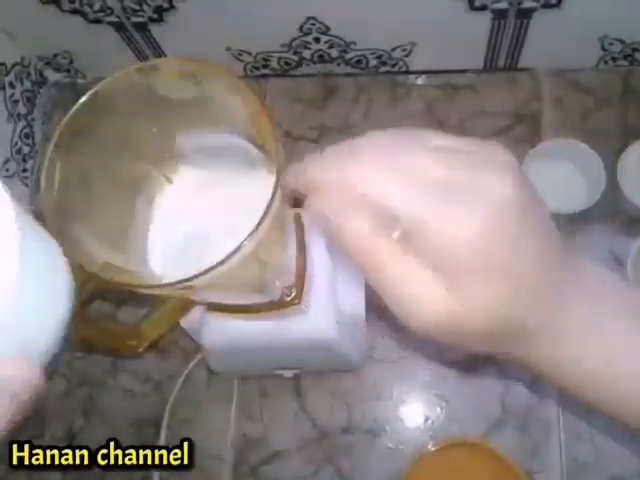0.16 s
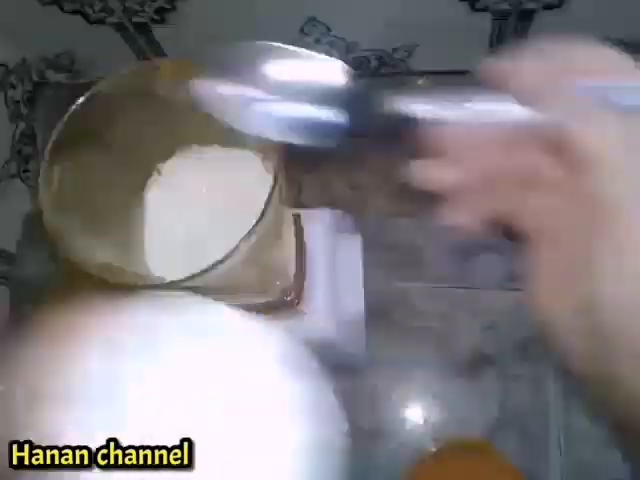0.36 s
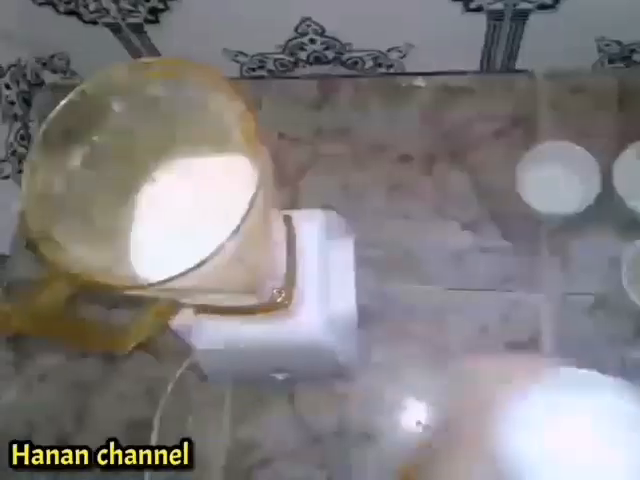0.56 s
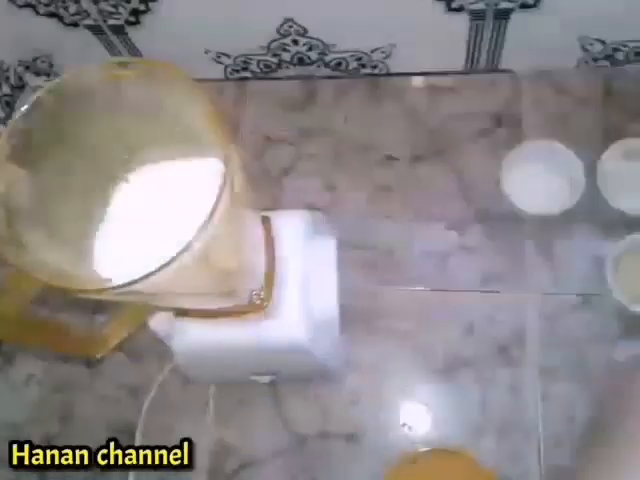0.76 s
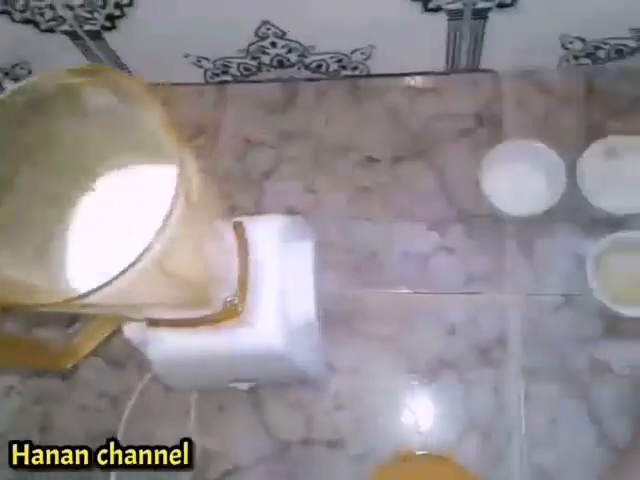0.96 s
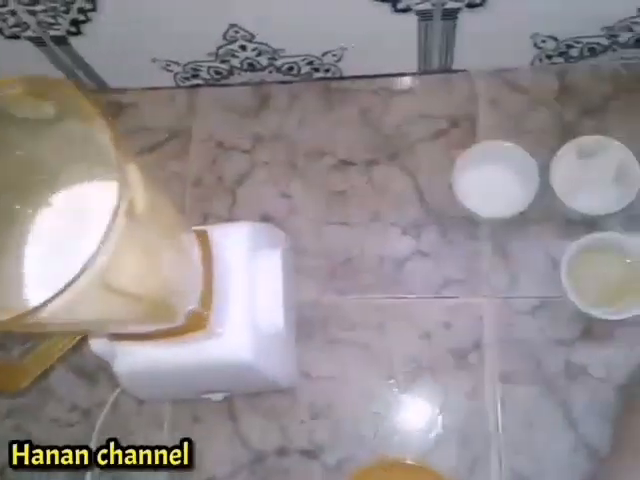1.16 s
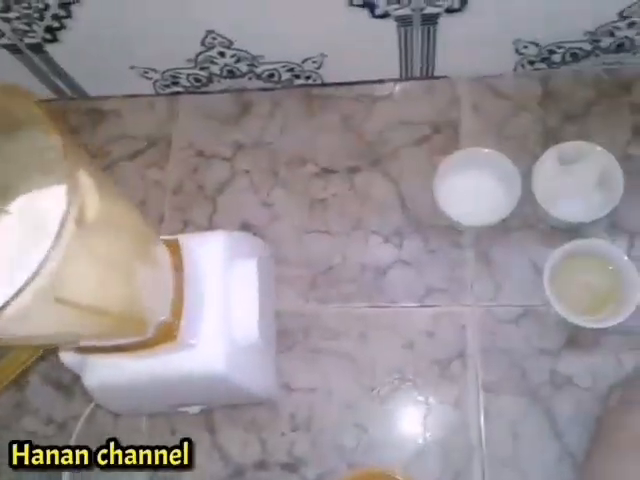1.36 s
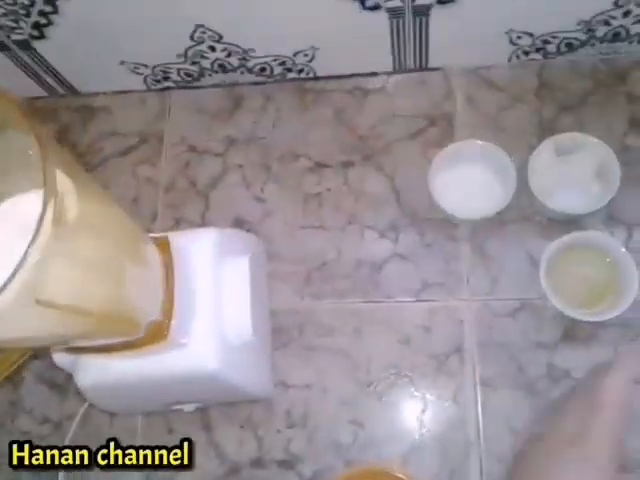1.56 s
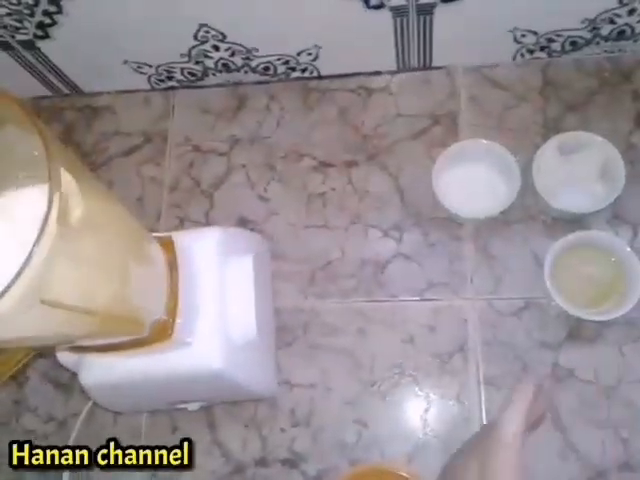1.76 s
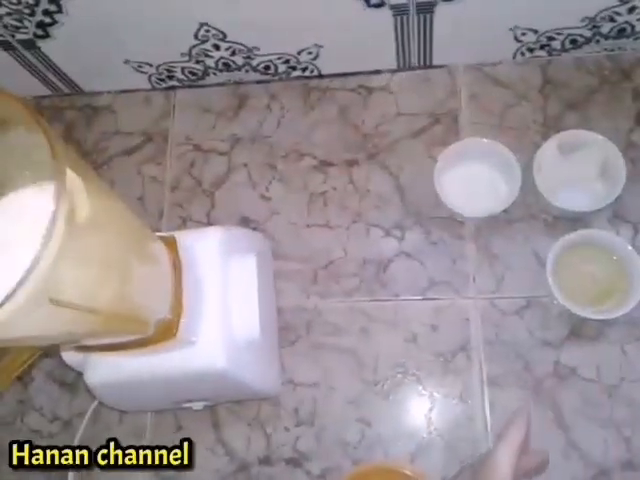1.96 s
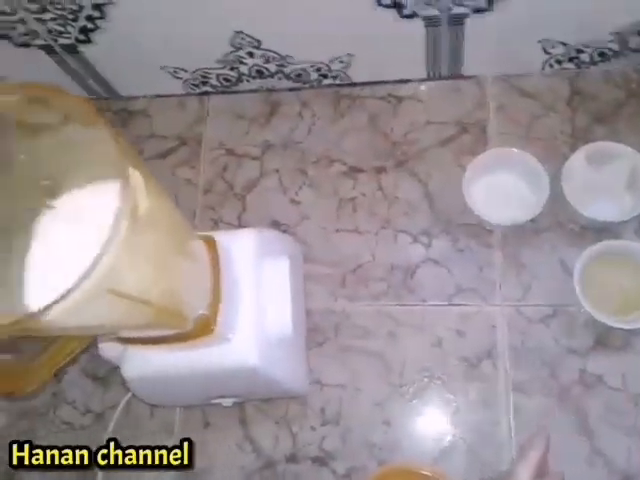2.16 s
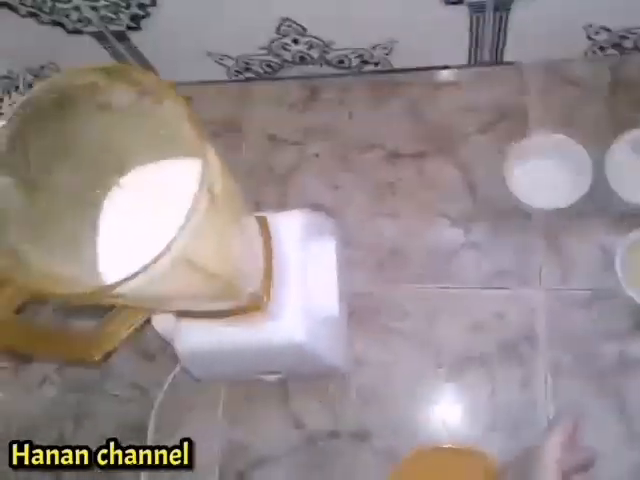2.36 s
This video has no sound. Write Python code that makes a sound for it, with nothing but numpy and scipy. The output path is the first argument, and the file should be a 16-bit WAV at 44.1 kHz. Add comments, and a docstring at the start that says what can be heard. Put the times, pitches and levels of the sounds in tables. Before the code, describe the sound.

Metal spoon knocks on the rim of a plastic blender jug, very close and slightly overloaded, at 0.23 and 0.38 seconds, the second with a swelling hollow ring. Faint wavering hum and room noise remain. From 1.32 to 1.47 a small china bowl rocks down onto stone; at 1.7 the spoon grates, then clinks and chatters brightly until 1.9. Tiled-kitchen echo fades into quiet by 2.5.

```python
"""First a faint, wavering low hum in soft room noise, in a tiled kitchen that rings after each sound.
Close to the microphone a metal spoon knocks twice on the rim of a plastic blender jug to shake off sugar:
noise bursts for the wall, slowly building sine modes for the hollow jug.
A small china bowl is set down on the stone counter, and the spoon slides and chatters into it:
damped modes of bowl and spoon, struck by single blows and by trains of tiny stick-slip pulses."""
import sys
import numpy as np
from scipy import signal
from scipy.fft import rfft, irfft, next_fast_len
from scipy.io import wavfile
from scipy.ndimage import uniform_filter1d, map_coordinates

SR = 44100
rng = np.random.default_rng(int(sys.argv[2]) if len(sys.argv) > 2 else 0)


def unload_wav(signal):
    """Save mono or channel-first audio to the path in sys.argv[1] as 16-bit WAV at rate SR, clipped to [-1, 1]."""
    wavfile.write(
        sys.argv[1],
        SR,
        np.round(np.clip(np.atleast_2d(signal).T, -1, 1) * 32767).astype(np.int16),
    )


N = 110250
RING_S = .9  # length of every ringing sound


def undb(db):
    """Level in dB to amplitude."""
    return 10 ** (np.asarray(db) / 20)


def unit(x):
    """Scale to an RMS of 1."""
    return x / np.sqrt(np.mean(x ** 2))


def ring_time():
    """Seconds since a blow."""
    return np.arange(int(RING_S * SR)) / SR


def fade(t60_s):
    """Exponential decay that falls 60 dB in t60_s."""
    return np.exp(-np.log(1000) * ring_time() / t60_s)


def colour(x, points):
    """Filter by a (f/Hz, level/dB) curve of unit mean power, with no ringing ahead of an attack."""
    size = 2 * next_fast_len(len(x))
    hz, db = np.array(points).T
    bin_hz = np.arange(size // 2 + 1) * SR / size
    gain = undb(np.interp(np.log(bin_hz + 1), np.log(hz), db))
    # folding the cepstrum onto positive times gives minimum phase
    cepstrum = irfft(np.log(unit(gain)))
    cepstrum[1:size // 2] *= 2
    cepstrum[size // 2 + 1:] = 0
    return irfft(rfft(x, size) * np.exp(rfft(cepstrum)))[:len(x)]


def soften(x, hz, order=2):
    """A softer contact leaves out the treble."""
    lowpass = signal.butter(order, min(hz, SR / 2 - 1), fs=SR, output="sos")
    return signal.sosfilt(lowpass, x)


def ring(modes, t60_s, damping, spot_db=0):
    """Partials that die sooner the higher they lie; the spot struck shifts their balance."""
    t = ring_time()
    spot = spot_db * rng.standard_normal(len(modes))
    out = np.zeros(len(t))
    for k, (hz, db) in enumerate(modes):
        sign = (-1) ** k  # neighbours start in opposite directions
        decay = fade(t60_s * (hz / 1000) ** -damping)  # t60_s holds at 1 kHz
        out += sign * undb(db + spot[k]) * decay * np.sin(2 * np.pi * hz * t)
    return out


def clack(points, t60_s):
    """Modes too dense and short to be told apart: fading coloured noise."""
    return colour(rng.standard_normal(len(ring_time())) * fade(t60_s), points)


def add(track, s, sound):
    """Mix a sound in from time s."""
    start = int(s * SR)
    track[start:start + len(sound)] += sound[:N - start]


def walk(rate):
    """Slow random drift with an RMS of 1."""
    k = int(SR / rate)
    steps = np.repeat(rng.standard_normal(N // k + 1), k)
    return unit(uniform_filter1d(uniform_filter1d(steps, k), k)[:N])


# Low appliance tones in the kitchen: f/Hz, level/dB
HUM_TONES = [(108, -62), (146.5, -62), (344.5, -68), (393, -69)]
# Spectrum of the room noise at the microphone: f/Hz, level/dB per Hz
AIR_SPECTRUM = [(20, -20.5), (45, -6.5), (110, -9), (370, -9.5), (660, -10), (1100, -17.5), (2080, -11.5),
                (2900, -21.5), (4300, -18), (5500, -30.5), (7100, -31), (8300, -46), (15000, -35)]
HUM_WAVER_DB, AIR_DB = 6, -52.5


def background():
    """An appliance hum, wavering in level and phase, in soft room noise."""
    t = np.arange(N) / SR
    hum = np.zeros(N)
    for hz, db in HUM_TONES:
        level = undb(db + HUM_WAVER_DB * walk(4.6))
        hum += level * np.sqrt(2) * np.sin(2 * np.pi * hz * t + .5 * walk(8.9))
    return hum + undb(AIR_DB) * colour(rng.standard_normal(N), AIR_SPECTRUM)


# Reverberation of the tiled kitchen: f/Hz, t60/s
KITCHEN_T60 = [(150, .5), (600, .35), (2000, .41), (6000, .35), (9000, .28), (14000, .25)]
ROOM_BUILD_S = 0.012


def kitchen(x):
    """Dense reflections from tiles: decaying noise, each band with its own reverberation time."""
    t = ring_time()
    hz, t60_s = np.array(KITCHEN_T60).T
    noise = rfft(rng.standard_normal(len(t)))
    log_hz = np.log(np.arange(len(noise)) / RING_S + 1)
    tail = np.zeros(len(t))
    for share, decay_s in zip(np.eye(len(hz)), t60_s):
        band = irfft(noise * np.interp(log_hz, np.log(hz), share), len(t))
        tail += band * fade(decay_s)
    tail = tail * (1 - np.exp(-t / ROOM_BUILD_S))
    return signal.fftconvolve(x, tail / np.linalg.norm(tail))[:N]


BOOM_HZ, BOOM_T60_S = 107, .55


def boom():
    """The low room mode that swells after a blow."""
    t = ring_time()
    return np.sin(2 * np.pi * BOOM_HZ * t) * fade(BOOM_T60_S) * (1 - np.exp(-t / ROOM_BUILD_S))


# Knocks on the rim, close to the microphone: t/s, wall clack level/dB, ring level/dB, ring build-up/s
JUG_KNOCKS = [(0.234, -4.5, -9, 0.011), (0.382, -1.5, 2.5, 0.048)]
# The spoon rebounds on the rim, and the jug ticks faintly afterwards: t/s, level/dB
RIM_TICKS = [(.2405, -10), (.2505, -19), (.3995, -38), (0.781, -47.5)]
# Modes of the hollow jug: f/Hz, level/dB
JUG_MODES = [(298, -18), (352, -16), (458, -7), (491, 2), (660, -12), (738, -14), (798, -12), (838, -4),
             (937, -12), (1250, -12), (1566, -17), (1801, -14), (1909, -11), (2064, -17)]
# Dense, quickly damped modes of its walls: f/Hz, level/dB per Hz
JUG_WALL_SPECTRUM = [(50, -57), (170, -21.5), (280, -7), (400, -2), (750, 4), (1100, -5), (1400, -11.5),
                     (2000, -2), (3200, -13), (4400, -8), (7200, -23.5), (8000, -38), (15000, -42.5)]
# The hard, dry tick of its rim: f/Hz, level/dB per Hz
RIM_TICK_SPECTRUM = [(200, -24), (2000, 4.5), (5500, -4.5), (8500, -24.5), (15000, -29.5)]
# damping: the power of frequency by which the ring shortens
JUG_T60_S, JUG_DAMPING = .22, .05
JUG_CLACK_T60_S, JUG_TICK_T60_S = 0.08, 0.047
JUG_ROOM_DB, JUG_RING_ROOM_DB, BOOM_JUG_DB = -9.5, -8.5, -31


def jug():
    """Each knock clacks in the plastic wall, then the hollow jug rings."""
    wall, hollow = np.zeros((2, N))
    for s, clack_db, ring_db, build_s in JUG_KNOCKS:
        add(wall, s, undb(clack_db) * clack(JUG_WALL_SPECTRUM, JUG_CLACK_T60_S))
        build = 1 - np.exp(-ring_time() / build_s)
        add(hollow, s, undb(ring_db) * ring(JUG_MODES, JUG_T60_S, JUG_DAMPING) * build)
        add(hollow, s, undb(clack_db + BOOM_JUG_DB) * boom())
    for s, db in RIM_TICKS:
        add(wall, s, undb(db) * clack(RIM_TICK_SPECTRUM, JUG_TICK_T60_S))
    return wall + hollow + kitchen(undb(JUG_ROOM_DB) * wall + undb(JUG_RING_ROOM_DB) * hollow)


# Modes of the bowl on the counter: f/Hz, level/dB
BOWL_MODES = [(355, -18), (938, -14), (1122, -12), (1440, -6), (1552, -5), (1655, -7), (1782, -5),
              (1918, -7), (2160, -10), (3192, 4), (3260, -4), (4190, -12), (4330, -12), (6650, -18),
              (6986, -15), (8000, -11), (10890, -20), (13660, -14)]
# Its short clack: f/Hz, level/dB per Hz
BOWL_CLACK_SPECTRUM = [(50, -40), (150, -33), (400, -14.5), (750, -11), (1050, -5.5), (1600, 4.5),
                       (2600, -6), (3250, -1.5), (5300, -20.5), (7000, -10), (8000, -24), (8700, -27.5),
                       (15000, -29)]
BOWL_T60_S, BOWL_DAMPING, BOWL_CLACK_T60_S, BOWL_RING_DB = .22, .35, 0.096, -7.5


def bowl_blow():
    """One blow on the china bowl: a short clack and the ringing modes."""
    modes = ring(BOWL_MODES, BOWL_T60_S, BOWL_DAMPING)
    return clack(BOWL_CLACK_SPECTRUM, BOWL_CLACK_T60_S) + undb(BOWL_RING_DB) * modes


# Modes of the spoon: f/Hz, level/dB
SPOON_MODES = [(2328, -5), (3215, -1), (4335, -13), (4667, -14), (6042, -4), (6380, -10), (7017, -1),
               (8000, -12), (8964, -16), (10854, -2), (12019, 0), (12090, -1), (12400, -7), (13250, -5),
               (13650, 0), (14600, -2), (14720, -2), (15250, -5)]
# The tick of its contact: f/Hz, level/dB per Hz
SPOON_TICK_SPECTRUM = [(1000, -17), (4500, 0), (7000, -11.5), (8700, -2.5), (10300, -4.5), (12000, 5.5),
                       (15000, 3)]
SPOON_T60_S, SPOON_DAMPING, SPOON_TICK_T60_S = .24, .5, 0.024
SPOON_RING_DB, SPOON_SPOT_DB = -8, 3


def spoon_blow():
    """One blow on the steel spoon, at a new spot each time."""
    modes = ring(SPOON_MODES, SPOON_T60_S, SPOON_DAMPING, SPOON_SPOT_DB)
    return clack(SPOON_TICK_SPECTRUM, SPOON_TICK_T60_S) + undb(SPOON_RING_DB) * modes


# The bowl touches down on stone: t/s, bowl level/dB, brightness f/Hz, level/dB of the spoon jolted in it
BOWL_TOUCHES = [(1.3209, -18.5, 2740, -74.5), (1.328, -21.5, 2690, -83), (1.3651, -29.5, 2500, -58),
                (1.4015, -29.5, 2480, -71), (1.415, -21.5, 3400, -68.5), (1.4188, -27, 5200, -64.5),
                (1.46, -10.5, 14000, -31), (1.467, -16.5, 6800, -45)]
BOOM_BOWL_DB = -26


def set_down(bowl, spoon):
    """The bowl rocks onto its foot: softened blows with a room boom, each jolting the spoon."""
    for s, bowl_db, bright_hz, spoon_db in BOWL_TOUCHES:
        touch = soften(bowl_blow(), bright_hz, order=4) + undb(BOOM_BOWL_DB) * boom()
        add(bowl, s, undb(bowl_db) * touch)
        add(spoon, s, undb(spoon_db) * spoon_blow())


# The spoon strikes the bowl: t/s, spoon level/dB, bowl level/dB
SPOON_STRIKES = [(1.62, -55, -59), (1.7612, -22.5, -20), (1.772, -20, -28), (1.8, -22, -21.5),
                 (1.8056, -20, -18.5), (1.825, -27, -24), (1.838, -28, -34), (1.848, -16.5, -30.5),
                 (1.8789, -39, -23.5)]


def clinks(bowl, spoon):
    """The spoon is let go and rattles in the bowl; every strike rings both."""
    for s, spoon_db, bowl_db in SPOON_STRIKES:
        add(bowl, s, undb(bowl_db) * bowl_blow())
        add(spoon, s, undb(spoon_db) * spoon_blow())


SLIDE_SCATTER_DB, SLIDE_JERK_DB, SLIDE_JERKS_PER_S = 3.5, 3, 160


def catches(per_s):
    """Stick-slip: tiny pulses of uneven size that come in jerks."""
    pulses = (rng.random(N) < per_s / SR) * rng.choice([-1, 1], N)
    scatter_db = SLIDE_SCATTER_DB * rng.standard_normal(N)
    jerk_db = SLIDE_JERK_DB * walk(SLIDE_JERKS_PER_S)
    return unit(pulses * undb(scatter_db + jerk_db))


# Resonances of the handle dragging over the rim before the spoon drops: f/Hz, level/dB
DRAG_MODES = [(1170, -6.5), (1450, 0.5), (1650, -0.5), (2750, -10), (6400, -12)]
DRAG_START_S, DRAG_SWELL_S, DRAG_HOLD_S, DRAG_T60_S = 1.69, 0.049, 0.022, .018
DRAG_DB, DRAG_CATCHES_PER_S = -29, 2200
DRAG_SAG_PER_S = .3  # share of the pitch lost each second


def drag():
    """The handle grates over the rim: swelling stick-slip rings resonances that sink in pitch."""
    t = ring_time()
    body = ring(DRAG_MODES, DRAG_T60_S, SPOON_DAMPING)
    swell = np.minimum(t / DRAG_SWELL_S, 1) ** 2 * (t < DRAG_SWELL_S + DRAG_HOLD_S)
    force = catches(DRAG_CATCHES_PER_S)[:len(t)] * swell
    sound = signal.fftconvolve(force, body / np.linalg.norm(body))
    # reading ever more slowly lowers the pitch
    read_s = t - DRAG_SAG_PER_S * t ** 2 / 2
    return undb(DRAG_DB) * map_coordinates(sound, [read_s * SR])


# Sliding between the strikes: t/s, level/dB in the spoon, level/dB in the bowl
SLIDE_LEVELS = [(1.748, -57.5, -56), (1.769, -45.5, -46.5), (1.779, -16, -30.5), (1.83, -23, -33),
                (1.85, -15, -35.5), (1.881, -27.5, -27), (1.897, -38, -56), (1.95, -58, -54.5)]
SLIDE_CATCHES_PER_S, SLIDE_HOPS_PER_S = 2300, 60
SLIDE_LOW_HZ, SLIDE_BRIGHT_HZ = 990, 1880  # band of the bowl's answer


def rub(push, db, body):
    """A rubbing force, at a level that follows db, rings a body."""
    t, s = np.arange(N) / SR, np.array(SLIDE_LEVELS)[:, 0]
    force = push * undb(np.interp(t, s, db))
    return signal.fftconvolve(force, body / np.linalg.norm(body))[:N]


def slide(count=5):
    """Steel catches and slips on the glaze, hopping among count spots; every catch rings spoon and bowl."""
    t = np.arange(N) / SR
    s, spoon_db, bowl_db = np.array(SLIDE_LEVELS).T
    force = catches(SLIDE_CATCHES_PER_S) * (t > s[0]) * (t < s[-1])
    spot = np.floor(t * SLIDE_HOPS_PER_S) % count
    spoon = sum(rub(force * (spot == k), spoon_db, spoon_blow()) for k in range(count))
    contact = signal.butter(2, [SLIDE_LOW_HZ, SLIDE_BRIGHT_HZ], "bandpass", fs=SR, output="sos")
    bowl = rub(force, bowl_db, signal.sosfilt(contact, bowl_blow()))
    return spoon, bowl


BOWL_ROOM_DB, SPOON_ROOM_DB = -12.5, -10


def bowl_and_spoon():
    """Touchdown, strikes, drag and slide of bowl and spoon, heard direct and through the kitchen."""
    spoon, bowl = slide()
    set_down(bowl, spoon)
    clinks(bowl, spoon)
    add(bowl, DRAG_START_S, drag())
    return bowl + spoon + kitchen(undb(BOWL_ROOM_DB) * bowl + undb(SPOON_ROOM_DB) * spoon)


# Spectrum of the bump through the counter: f/Hz, level/dB per Hz
THUD_SPECTRUM = [(25, -3.5), (130, -1), (260, -18.5), (3000, -80)]
THUD_AT_S, THUD_DB, THUD_T60_S = 1.774, -34.5, .07


def thud():
    """A dull, short bump through the counter: fading low noise."""
    out = np.zeros(N)
    add(out, THUD_AT_S, undb(THUD_DB) * clack(THUD_SPECTRUM, THUD_T60_S))
    return out


# Everything at the microphone grows quieter after the rattle: t/s, level/dB
OVERALL_LEVEL = [(1.88, 1), (2.001, -4.5), (2.5, -6.5)]


def scene():
    """All sounds at one microphone; the level sinks at the end."""
    s, db = np.array(OVERALL_LEVEL).T
    level = undb(np.interp(np.arange(N) / SR, s, db))
    return (level * (background() + jug() + bowl_and_spoon() + thud()))[None]


TOP_HZ = 15400


def record(dry):
    """The loudest peaks overload the recorder, and the top is cut."""
    clipped = dry / (1 + dry ** 8) ** (1 / 8)
    lowpass = signal.ellip(10, .2, 70, TOP_HZ, fs=SR, output="sos")
    return signal.sosfilt(lowpass, clipped)


dry = scene()
out = record(dry)
unload_wav(out)
```